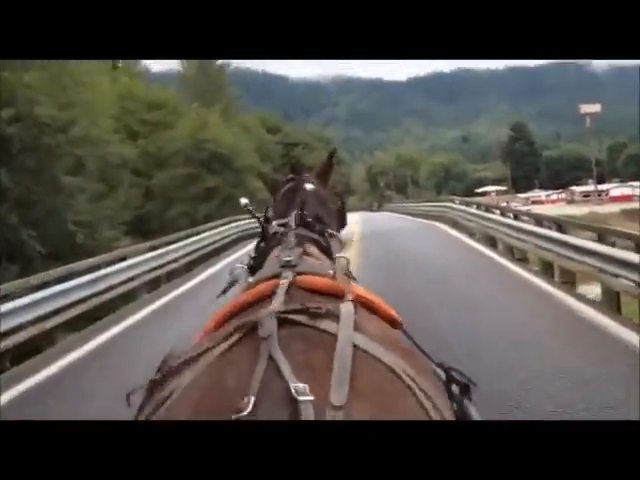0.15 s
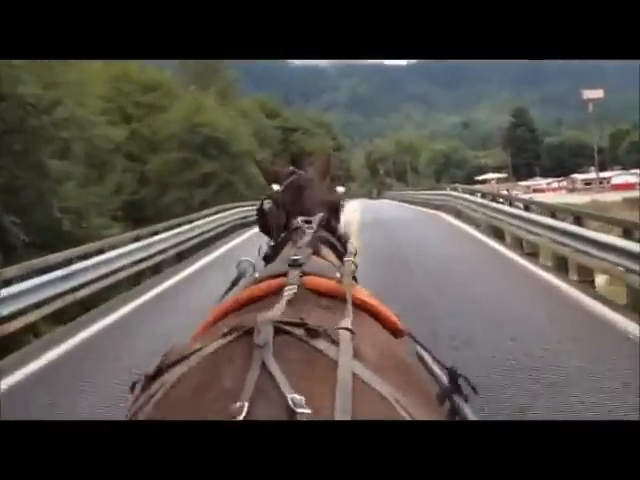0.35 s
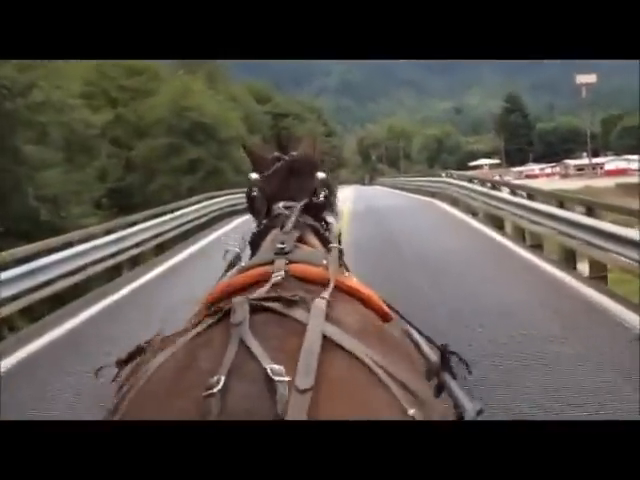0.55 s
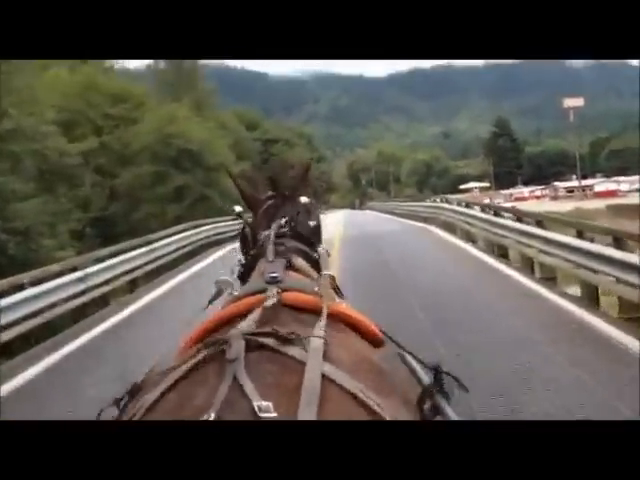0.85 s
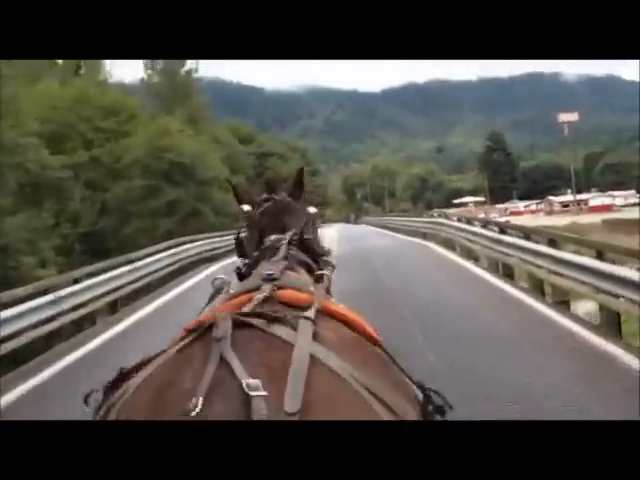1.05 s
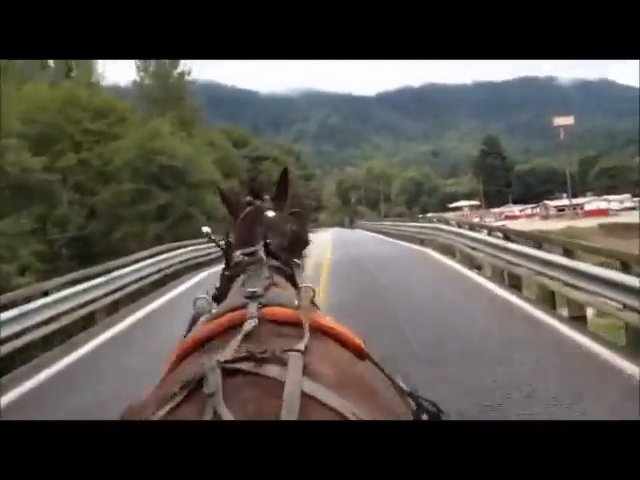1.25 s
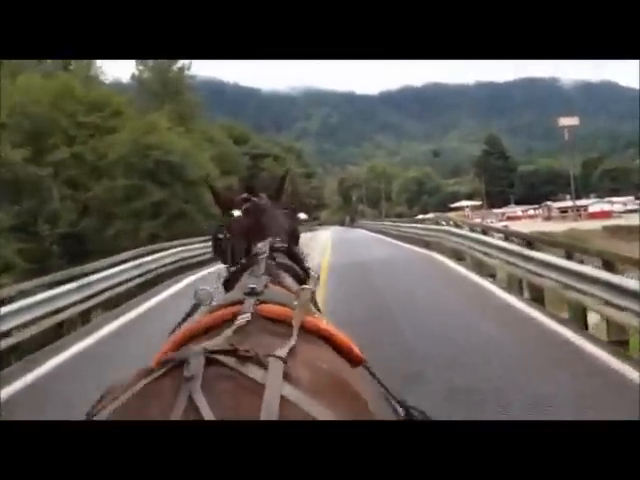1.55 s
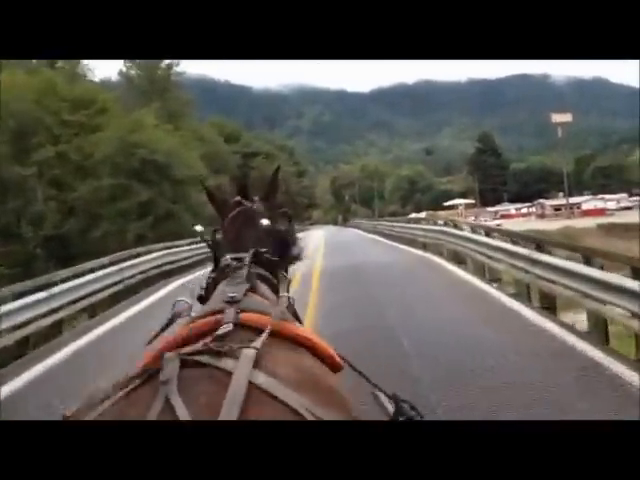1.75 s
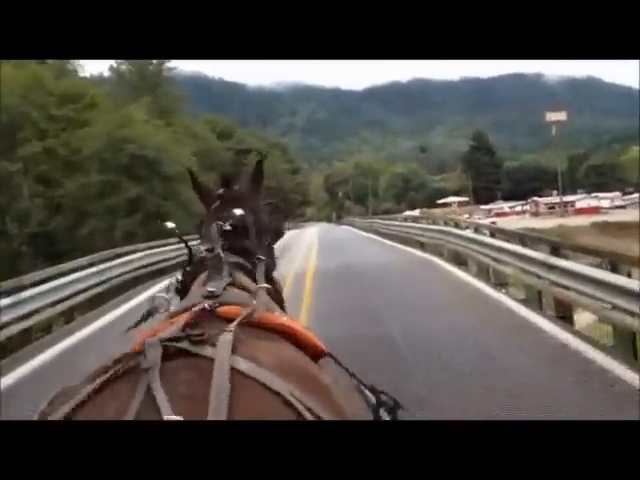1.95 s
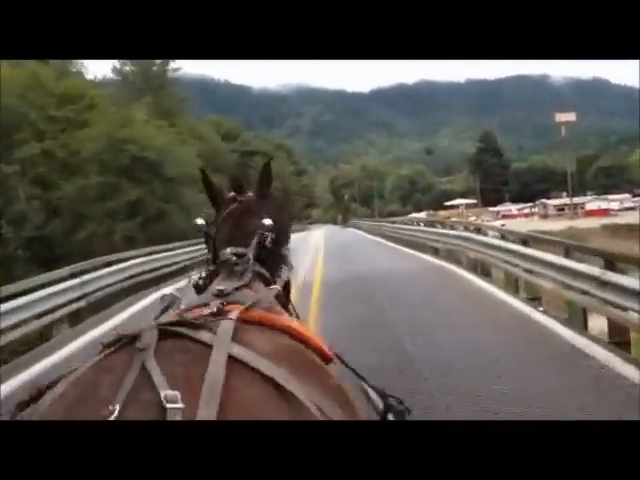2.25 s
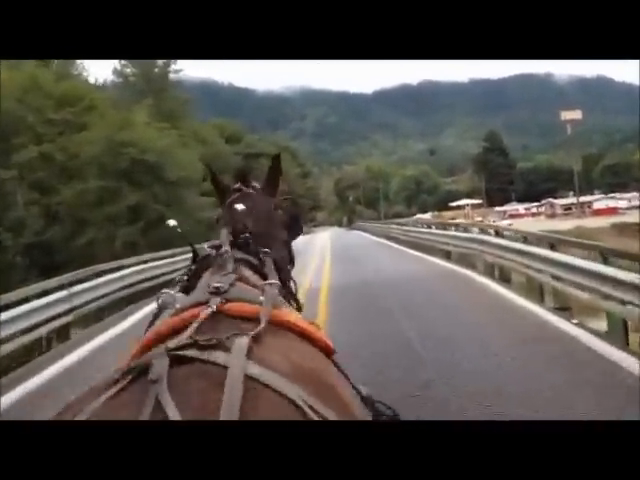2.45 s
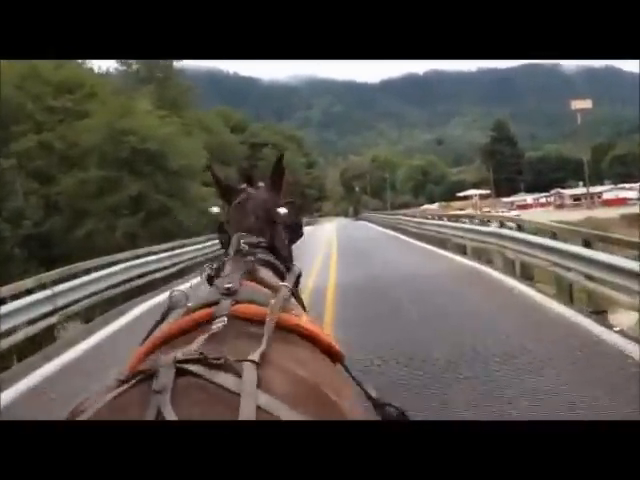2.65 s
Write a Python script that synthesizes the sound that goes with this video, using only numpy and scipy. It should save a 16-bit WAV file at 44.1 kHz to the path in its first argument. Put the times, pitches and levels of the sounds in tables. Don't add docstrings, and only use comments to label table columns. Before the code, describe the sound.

Shod horse trotting on a hard paved road, heard from the rattling cart behind it

```python
import sys
import numpy as np
from scipy import signal
from scipy.fft import rfft, irfft, next_fast_len
from scipy.io import wavfile

SR = 44100
rng = np.random.default_rng(int(sys.argv[2]) if len(sys.argv) > 2 else 0)


def convert_level_to_amplitude(level_db):
    exponent = np.asarray(level_db, float) / 20
    return 10 ** exponent


def transcribe(u):
    v = np.clip(np.atleast_2d(u).T, -1, 1)
    q = np.round(v * 32767).astype(np.int16)
    wavfile.write(sys.argv[1], SR, q)


N = 123039

# start in seconds, clatter level in dB, boom level over the clatter in dB,
# hold in seconds, boom tilt in dB per octave.
HOOVES = [(0.213, -5, 0.5, 0.0073, -1.5), (0.242, -5.5, -2.5, 0.011, -0.7), (0.405, -12.5, 9, 0.011, -1.5),
          (0.42, -4.5, -2.5, 0.027, -3.5), (0.4633, -6.5, -14, 0.013, 6), (0.523, -7, 0.5, 0.013, 2.5),
          (0.5403, -2.5, -7.5, 0.025, -4), (0.8168, -2, -2.5, 0.012, -0.6),
          (0.846, -10.5, -12.5, 0.014, 11.5), (0.989, -13, 5, 0.04, -0.7), (1.003, -5, -6.5, 0.0057, 1),
          (1.122, -13.5, 1, 0.011, -0.5), (1.136, -8, -7, 0.02, -1.5), (1.4046, -3.5, -3, 0.037, -0.3),
          (1.6815, -26, -3, .003, -3), (1.683, -4.5, -6.5, 0.025, -5), (1.706, -5.5, -5.5, 0.021, 4.5),
          (1.88, -16, 12, 0.0053, 1.5), (1.889, -8, 0.5, 0.0073, -2.2), (1.967, -8, 3, 0.006, 3.8),
          (1.976, -6.5, 0.5, 0.032, -3), (2.192, -9, -14, 0.0037, 11.5), (2.254, -10, -1.5, 0.007, 5),
          (2.2584, -7.5, -3, 0.017, 3.3), (2.28, -1.5, -5, 0.017, 3), (2.534, -4.5, -5, 0.031, 1.5)]
SCUFFS = [(0, -23.5, -1, 0.012, 4), (0.062, -23, -11, 0.0037, 12.5), (.114, -35, -5, .01, .1),
          (0.12, -26, 1.5, 0.0063, 5.5), (0.144, -29, -16, 0.019, -5), (0.688, -18, -3, 0.0041, -9),
          (0.73, -12.5, -12, 0.0084, 3), (0.769, -19, 5, .002, -4), (1.248, -17.5, -11.5, 0.0031, 10),
          (1.315, -23, -9.5, 0.003, 10.5), (1.598, -30, 15.5, 0.014, -6), (1.616, -32, -0.5, .004, 6.5),
          (1.842, -29, 8, 0.011, -3), (2.156, -15.5, -3, 0.0048, 6.5), (2.401, -25.5, -7, 0.01, .1),
          (2.431, -16, 3, 0.012, -0.5), (2.46, -23, 5.5, 0.0078, 3.2), (2.535, -29, -5, .004, -2),
          (2.671, -24, 8.5, 0.011, -1), (2.725, -29, 4, 0.004, -4)]
BOOM_GRIT_DB = 3.07


def rms_one(x):
    return x / np.sqrt(np.mean(x ** 2) + 1e-20)


def in_time(rows):
    return np.interp(np.arange(N) / SR, *np.transpose(rows))


def at_hz(points, hz):
    table_hz, values = np.transpose(points)
    return np.interp(np.log(hz), np.log(table_hz), values)


def drift(rate):
    r = np.exp(-80 * np.pi * rate / SR)
    noise = rng.standard_normal(N // 40 + 2002)
    slow = signal.lfilter([1], [1, -2 * r, r * r], noise)[2000:]
    return np.interp(np.arange(N) / 40, np.arange(len(slow)), rms_one(slow))


def grit(spread_db):
    pebbles_per_s, pebble_db = 350, 14.5
    sizes = convert_level_to_amplitude(spread_db * np.minimum(rng.exponential(1, (2, N)), 6))
    contacts = rms_one(sizes * rng.standard_normal((2, N)))
    struck = rng.random(N) < pebbles_per_s / SR
    pebbles = struck * convert_level_to_amplitude(pebble_db) * rng.standard_normal(N)
    return rms_one(contacts + pebbles)


def bank(source, spectrum, gain):
    edges = 25 * 2 ** np.arange(0, 9.5, 1 / 3)
    hz = np.sqrt(edges[1:] * edges[:-1])
    used = (hz > spectrum[0][0]) & (hz < spectrum[-1][0])
    level = convert_level_to_amplitude(at_hz(spectrum, hz))
    level = level / np.sqrt(np.sum((level ** 2 * np.diff(edges))[used]) / (SR / 2))
    out = np.zeros(N)
    for k in np.flatnonzero(used):
        band = signal.butter(2, edges[k:k + 2], "band", fs=SR, output="sos")
        out += level[k] * gain(hz[k]) * signal.sosfilt(band, source[k % 2])
    return out


def resonate(x, hz, width_hz):
    r = np.exp(-np.pi * width_hz / SR)
    poles = [1, -2 * r * np.cos(2 * np.pi * hz / SR), r * r]
    return signal.lfilter([(1 - r * r) / 2, 0, (r * r - 1) / 2], poles, x)


def blows(s, db, hold, rise_s, t60):
    power = convert_level_to_amplitude(2 * (db + 0.88 * rng.standard_normal(len(s))))
    start = (s * SR).astype(int)
    stop = np.minimum((s + hold) * SR, N - 1).astype(int)
    steps, ends = np.zeros(N), np.full(N, 1e-18)
    np.add.at(steps, start, power)
    np.add.at(steps, stop, -power)
    np.add.at(ends, stop, power)
    tails = signal.lfilter([1], [1, -convert_level_to_amplitude(-120 / (t60 * SR))], ends)
    r = np.exp(-1 / (rise_s * SR))
    return np.sqrt(np.abs(signal.lfilter([1 - r], [1, -r], np.cumsum(steps) + tails)))


def wheels():
    # frequency in Hz, level in dB per Hz.
    roll_colour = [(88, -21), (150, -0.5), (267, -1), (1600, -2), (4810, -28), (8100, -34), (13600, -33),
                   (15000, -24)]
    # time in seconds, level in dB.
    effort = [(0.0, -18.5), (0.28, -30), (0.41, -22.5), (.76, -20.5), (.8, -38), (.85, -24.5), (1.41, -22),
              (1.94, -17.5), (2.47, -15.5), (2.66, -18), (2.79, -20)]
    shared = drift(16)
    rolling = bank(grit(3.7), roll_colour, lambda hz: convert_level_to_amplitude(2.6 * shared + 3.4 * drift(5.1)))
    return convert_level_to_amplitude(in_time(effort) - 3.5) * rolling


def wind():
    # frequency in Hz, level in dB per Hz.
    wind_colour = [(15, -63), (25, -67), (64, -22.5), (188, 3), (227, -2), (265, 14), (336, -22.5),
                   (420, -4), (550, 6.5), (920, -120)]
    # time in seconds, level in dB.
    gusts = [(0.0, -19.5), (0.08, -31.5), (0.12, -32.5), (0.3, -21.5), (0.36, -29), (0.6, -22),
             (0.62, -25.5), (0.99, -30), (1.35, -32), (1.4, -26), (1.45, -25.5), (1.72, -27.5),
             (1.86, -41.5), (2.24, -19), (2.25, -29), (2.79, -29)]
    shared = drift(1.4)
    noise = rng.standard_normal((2, N))
    buffeting = bank(noise, wind_colour, lambda hz: convert_level_to_amplitude(0.13 * shared + 1.3 * drift(10.4)))
    return convert_level_to_amplitude(in_time(gusts) + 0.83) * buffeting


def clatter():
    # frequency in Hz, level in dB per Hz.
    colour = [(300, -24), (1000, -5.5), (2500, 2), (5000, -2.5), (8000, -2), (15000, -2.5)]
    # frequency in Hz, time to fall 60 dB in seconds.
    decay = [(300, 0.36), (2000, 0.35), (6000, 0.26), (15000, 0.16)]
    # start in seconds, clatter level in dB.
    toes = [
        (.2085, -9),
        (.5215, -17),
        (.8138, -26),
        (1.4006, -13),
        (1.9665, -18),
    ]
    # pitch in Hz, level in dB.
    iron = [(2640, -36), (3580, -19), (3830, -5.5), (4360, -6), (6300, 1), (6750, -2), (7930, -21),
            (8430, -3), (11450, 2), (11940, -13), (13100, -9)]
    level_db, rise_s, toe_s = -10.5, 0.00074, 0.0039
    edge_db, edge_band_hz = 19.5, [2000, 9000]
    crack_db, crack_t60_s, crack_tilt_db = 4.5, 0.12, 4
    patchy_db, patches_per_s = 2, 18

    s, db, _, hold, _ = np.transpose(HOOVES + SCUFFS)
    db = db + level_db
    early, toe_db = np.transpose(toes)
    edges = np.zeros(N)
    edges[(s * SR).astype(int)] = -convert_level_to_amplitude(db + edge_db)
    crack = blows(s, db + crack_db, 0 * s, rise_s, crack_t60_s)
    crack = crack + blows(early, toe_db + level_db, toe_s, rise_s, crack_t60_s)

    def strength(hz):
        bright_crack = crack * convert_level_to_amplitude(crack_tilt_db * np.log2(hz / 8000))
        body = blows(s, db, hold, rise_s, at_hz(decay, hz))
        return convert_level_to_amplitude(patchy_db * drift(patches_per_s)) * np.hypot(bright_crack, body)

    spray = bank(grit(0.7), colour, strength)
    edge_filter = signal.butter(2, edge_band_hz, "band", fs=SR, output="sos")
    spray = spray + signal.sosfilt(edge_filter, edges)
    return spray + sum(convert_level_to_amplitude(iron_db) * resonate(spray, hz, 57) for hz, iron_db in iron)


def boom():
    # frequency in Hz, level in dB per Hz.
    colour = [(200, -14), (400, -8), (680, -0.5), (1000, -3), (1500, -1.5), (2200, -5), (4500, -20.5),
              (9000, -53)]
    # frequency in Hz, time to fall 60 dB in seconds.
    decay = [(300, 0.3), (800, 1), (2000, 0.36), (6000, 0.22)]
    level_db, rise_s, hold_stretch = -7, 0.01, 1.51
    s, db, body_db, hold, tilt = np.transpose(HOOVES + SCUFFS)

    def strength(hz):
        band_db = db + body_db + level_db + tilt * np.log2(hz / 1000)
        return blows(s, band_db, hold * hold_stretch, rise_s, at_hz(decay, hz))

    return bank(grit(BOOM_GRIT_DB), colour, strength)


def ticks():
    # start in seconds, peak level in dB, pitch in Hz, cycles to fall 60 dB.
    buckles = [(.043, -24, 12600, 40), (.7772, 9, 1800, 3.9), (.7774, -17, 12000, 25),
               (.778, -28, 4870, 300), (.779, -34, 5100, 260), (.357, -29, 13000, 40),
               (0.408, -7, 900, 3.4), (.7285, -8, 3470, 5.2), (.6905, -34, 11000, 60),
               (0.7778, -18, 7840, 33), (0.991, -8, 1110, 8.8), (1.002, -0.5, 2460, 6.2),
               (1.345, -35.5, 11850, 1100), (1.345, -41, 11838, 890), (1.712, -18, 12500, 25),
               (1.713, -14, 8800, 20), (1.314, -31, 8450, 12), (1.321, -13, 4500, 8.3),
               (0.069, -12.5, 4000, 10), (.125, -42, 8000, 100), (0.2127, -11, 7600, 25),
               (.42, 0, 2580, 5.1), (.4357, -6, 1300, 2.5), (.439, 5, 1500, 3), (0.47, 3, 2000, 3),
               (.541, -17, 7900, 400), (0.8156, -11, 7700, 35), (.82, -24, 6500, 120),
               (1.003, -18, 7300, 37), (1.405, -14.5, 7850, 140), (1.687, -22, 8120, 300),
               (1.889, -20, 8100, 60), (1.977, -15.5, 6800, 170), (2.281, -8, 1200, 3),
               (2.286, 2, 2200, 4.3), (2.538, 2, 2450, 5.9), (2.54, -17, 6730, 100),
               (2.089, -26, 11000, 60), (2.091, -15, 13500, 60), (2.13, -30, 13000, 40),
               (2.751, -33, 12400, 80)]
    out, t = np.zeros(N + 4000), np.arange(4000) / SR
    for s, db, hz, cycles in buckles:
        decay = convert_level_to_amplitude(db + 8.0 - 60 * t * hz / cycles)
        attack = np.minimum(t * hz, 1)
        out[int(s * SR):][:len(t)] -= decay * attack * np.sin(2 * np.pi * hz * t)
    return out[:N]


def thumps():
    # start in seconds, pitch in Hz, level in dB.
    buffets = [
        (.06, 202, -14.5),
        (0.799, 258, -17),
        (1.38, 168, -17.5),
        (1.389, 262, -16.5),
        (1.41, 221, -24),
        (1.615, 256, -17.5),
        (1.701, 195, -15),
        (2.154, 183, -15),
        (2.214, 198, -13),
    ]
    t60_s = 0.045
    t, out = np.arange(N) / SR, np.zeros(N)
    for s, hz, db in buffets:
        after = t - s
        decay = convert_level_to_amplitude(db + 12 - 60 * np.abs(after) / t60_s)
        attack = 1 - np.exp(-np.maximum(after, 0) * hz)
        out += decay * np.sin(2 * np.pi * hz * after) * attack
    return out


def hollow_notes(rows, width, t60):
    shake = grit(BOOM_GRIT_DB)[0]
    out = np.zeros(N)
    for s, hz, db in rows:
        note = resonate(resonate(shake, hz, 2 * width * hz), hz, width * hz)
        out += rms_one(note) * blows(np.array([s]), db, 0.005, 0.0013, t60)
    return out


def knocks():
    # start in seconds, pitch in Hz, level in dB.
    panels = [(0.21, 1950, -15), (.212, 1340, -16.5), (.57, 268, -19), (0.722, 287, -24.5),
              (.25, 894, -17.5), (.43, 727, -31), (0.551, 1200, -17), (.83, 2010, -24), (.87, 720, -23.5),
              (1.0, 1480, -16.5), (1.21, 277, -23.5), (1.57, 1450, -32), (.406, 910, -28), (2.5, 553, -21),
              (1.415, 1370, -16), (1.43, 620, -16), (1.705, 774, -19), (1.713, 1730, -13),
              (1.880, 1355, -13.5), (1.98, 740, -32), (1.98, 1470, -15), (2.268, 555, -17),
              (2.28, 1490, -31), (2.55, 1010, -19.5)]
    return hollow_notes(panels, width=0.16, t60=0.58)


def drones():
    # start in seconds, pitch in Hz, level in dB.
    frame = [
        (.36, 170, -25),
        (.46, 195, -18.5),
        (1.425, 660, -15.5),
        (1.71, 770, -22),
        (1.8, 790, -23),
        (1.7, 516, -23.5),
        (1.48, 450, -25),
        (1.7, 1430, -15),
        (2.2, 710, -23),
        (1.885, 830, -22),
    ]
    return hollow_notes(frame, width=0.04, t60=0.43)


def scene():
    road_and_air = wheels() + wind() + thumps()
    hooves = clatter() + boom()
    cart = ticks() + knocks() + drones()
    return (road_and_air + hooves + cart)[None]


def top_cut(x):
    return signal.sosfilt(signal.butter(12, 15740, fs=SR, output="sos"), x)


def record(dry):
    # frequency in Hz, level in dB.
    mic_colour = [(3000, -1), (4900, -3.5), (6600, 1), (8300, 0), (9600, -6), (11400, -9.5), (12700, -10.5),
                  (15000, -20)]
    # frequency in Hz, width in Hz, depth from 0 to 1.
    dips = [(4750, 600, 0.15), (9850, 990, 0.47), (12700, 440, .4)]
    limit, cutoff_hz = 1.25, 15850
    size = next_fast_len(N + 999)
    hz = np.arange(size // 2 + 1) * SR / size + 1
    x = irfft(rfft(dry, size) * convert_level_to_amplitude(at_hz(mic_colour, hz)), size)[:, :N]
    for dip_hz, width_hz, depth in dips:
        x = x - depth * resonate(x, dip_hz, width_hz)
    rounded = limit * np.tanh(x / limit)
    low_pass = signal.cheby2(12, 60, cutoff_hz, fs=SR, output="sos")
    return top_cut(signal.sosfilt(low_pass, rounded))


dry = scene()
out = record(dry)
transcribe(out)
```